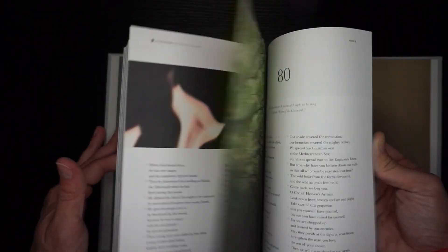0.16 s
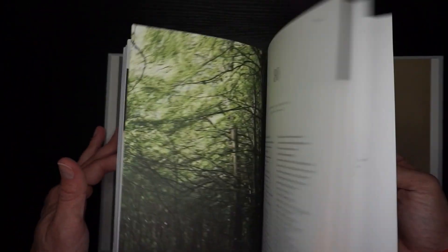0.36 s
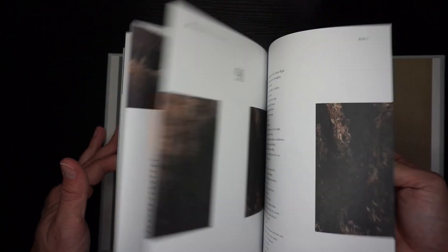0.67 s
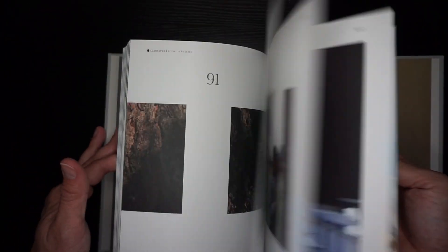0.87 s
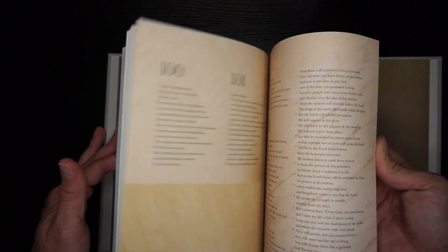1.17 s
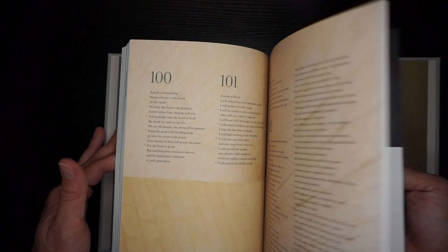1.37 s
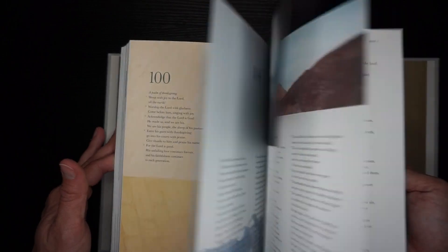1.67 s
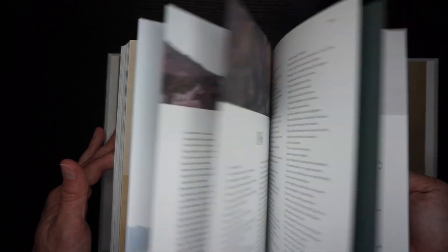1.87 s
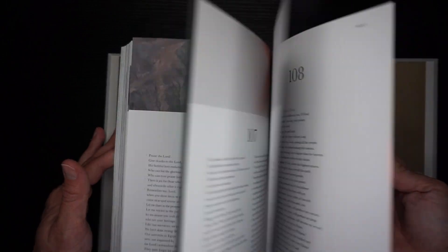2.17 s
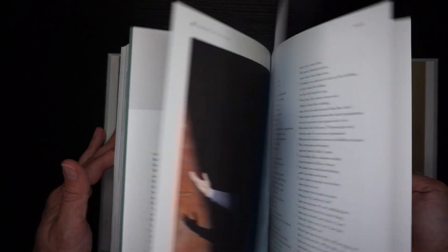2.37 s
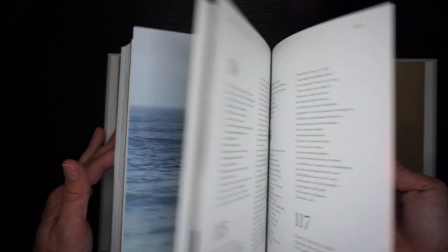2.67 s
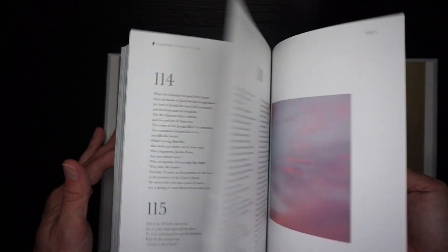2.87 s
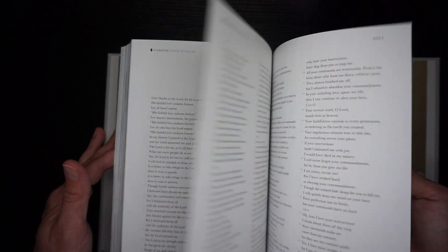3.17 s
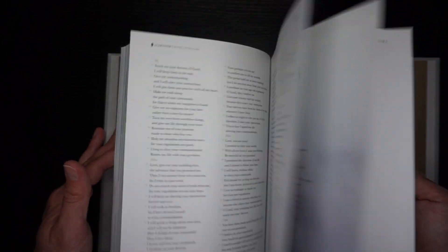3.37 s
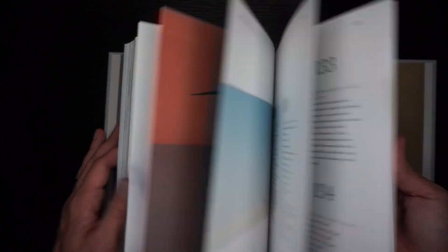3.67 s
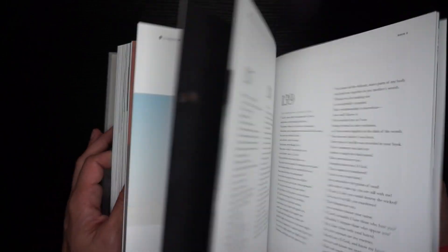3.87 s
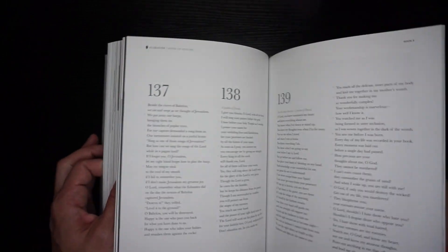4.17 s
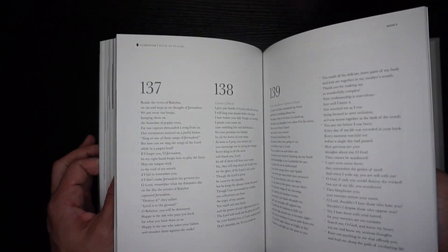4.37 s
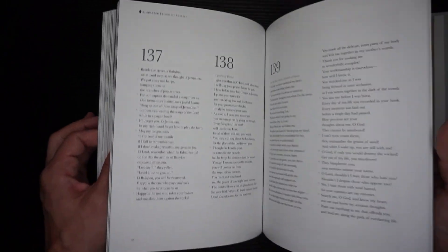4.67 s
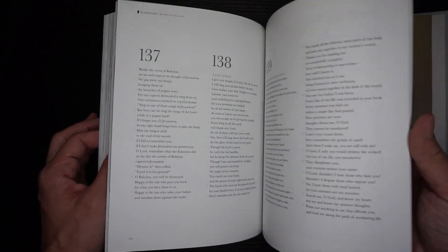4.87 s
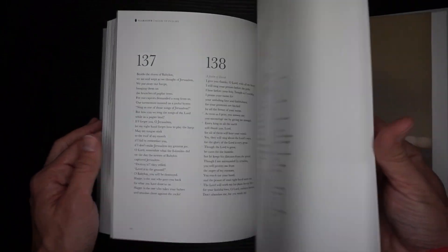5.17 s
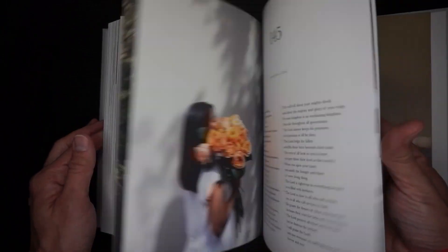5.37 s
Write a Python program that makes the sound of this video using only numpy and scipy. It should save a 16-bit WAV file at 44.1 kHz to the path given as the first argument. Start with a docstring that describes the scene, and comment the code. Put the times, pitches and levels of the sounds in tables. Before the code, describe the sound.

Pages of a hardcover book flick softly past a thumb, then the block of pages knocks and slides, close by.

```python
"""In a quiet room, close by, a thumb lets the glossy pages of a hardcover book go one by one.
Each edge flicks free and pops the wedge of air between the sheets. Paper rubs on paper in many tiny
catches and slips, and the thumb squeaks once. Then the hand takes a new grip: the block of pages knocks
and slides before the flipping goes on. Ventilation and a far motor hum softly underneath."""
import sys
import numpy as np
from scipy import signal
from scipy.fft import irfft
from scipy.io import wavfile
from scipy.ndimage import uniform_filter1d

SR = 44100
rng = np.random.default_rng(int(sys.argv[2]) if len(sys.argv) > 2 else 0)


def store_pcm(level_fs):
    """Save levels as 16-bit WAV."""
    pcm = np.round(np.clip(level_fs, -1, 1) * 32767).astype(np.int16)
    wavfile.write(sys.argv[1], SR, np.atleast_2d(pcm).T)


N = 243890


def gain_of(db):
    return 10 ** (np.asarray(db) / 20)


def unit_rms(x):
    return x / np.sqrt(np.mean(x ** 2) + 1e-20)


def unit_peak(x):
    return x / abs(x).max()


def curve_at(points, hz):
    point_hz, value = np.transpose(points)
    return np.interp(np.log(hz + 1), np.log(point_hz + 1), value)


def add(mix, start_s, sound):
    part = mix[..., round(start_s * SR):][..., :sound.shape[-1]]
    part += sound[..., :part.shape[-1]]


def filtered(x, kind, hz, order=3):
    return signal.lfilter(*signal.butter(order, hz, kind, fs=SR), x)


def ring(x, resonances):
    """Make x ring at each (pitch_hz, width_hz, level_db); neighbours get opposite signs."""
    out = 0
    for k, (hz, width_hz, db) in enumerate(resonances):
        b, a = signal.iirpeak(min(hz, SR / 2.2), hz / width_hz, SR)
        out = out + (-1) ** k * gain_of(db) * signal.lfilter(b, a, x)
    return unit_rms(out)


# The room's noise from bass to treble: pitch_hz, level_db
ROOM_TONE = [(15, -31), (25, -14), (50, -3.5), (80, -1), (160, -1), (310, -2), (500, -2.5), (700, -4),
             (1000, -6.5), (1500, -7), (2000, -12), (2500, -12), (4000, -15), (15600, -22)]
# How alike that noise is left and right: pitch_hz, likeness (1 = the same)
ROOM_LIKENESS = [(30, 0.97), (100, 1), (300, 0.21), (800, 0.017), (2000, 0.018), (5000, 0.087)]


def room(level_db=-58):
    """Ventilation rumbles and the microphones hiss, a little unevenly."""
    frames, hz = N // 256 + 5, np.fft.rfftfreq(1024, 1 / SR)
    a, b, c, d, patches = rng.standard_normal((frames, 513, 5)).T
    patches = unit_rms(uniform_filter1d(uniform_filter1d(patches, 10, 0), 14, 1))
    likeness = curve_at(ROOM_LIKENESS, hz)[:, None]
    left = a + 1j * b
    right = likeness * left + np.sqrt(1 - likeness ** 2) * (c + 1j * d)
    spectrum = np.array([left, right]) * gain_of(curve_at(ROOM_TONE, hz)[:, None] + 0.11 * patches)
    noise = signal.istft(spectrum, nperseg=1024, noverlap=768)[1][:, :N]
    return gain_of(level_db) * unit_rms(noise)


# How the motor's hum comes and goes: time_s, level_db
MOTOR_LEVELS = [(0, -71), (.6, -72.5), (1.3, -65.5), (2, -66.5), (3.2, -68.5), (3.6, -66.5), (5.53, -74.5)]
# Its two low notes: pitch_hz, width_hz, level_db
MOTOR_NOTES = [(94.5, 18.5, -2.2), (139.1, 10.3, -1.3)]


def far_motor():
    """A wavering hum: noise squeezed into two narrow, low bands."""
    hum = ring(ring(rng.standard_normal(N), MOTOR_NOTES), MOTOR_NOTES)
    level_db = np.interp(np.arange(N) / SR, *np.transpose(MOTOR_LEVELS))
    return hum * gain_of(level_db)


def wall_echoes(x, fade_s=0.083):
    """The walls send back a short tail of echoes, different left and right."""
    t = np.arange(6000) / SR
    echoes = rng.standard_normal((2, len(t))) * (rng.random((2, len(t))) < .06)
    echoes *= gain_of(-60 * t / fade_s) * (t > .003)
    echoes /= np.linalg.norm(echoes[0])
    return signal.oaconvolve(filtered(x, "high", 700, order=2)[None], echoes, axes=1)[:, :N]


# The cover bumps in the hand: start_s, level_db, pitch_hz
COVER_BUMPS = [(1.347, -52, 120), (3.176, -47, 131), (3.197, -56, 124), (3.801, -40, 231),
               (3.862, -33, 244), (3.885, -43, 141), (3.922, -36.5, 171), (3.949, -39, 220),
               (3.976, -45.5, 148)]


def cover_bumps():
    """Each bump is a soft, low push of little more than one wave."""
    out, t = np.zeros(N), np.arange(4000) / SR
    for start_s, db, hz in COVER_BUMPS:
        swell = t ** 2 * np.exp(-t * hz / .3)
        add(out, start_s, gain_of(db) * unit_peak(swell * np.sin(2 * np.pi * hz * t)))
    return out


# The path of the squeak: time_s, pitch_hz, level_db
SQUEAK_PATH = [(1.734, 2330, -61), (1.738, 2530, -39), (1.742, 2500, -44), (1.745, 3030, -42),
               (1.752, 3210, -40), (1.7555, 3320, -44), (1.761, 3130, -36.5), (1.767, 2960, -44.5),
               (1.774, 2750, -50)]


def thumb_squeak():
    """Skin sticks and slips in step on glossy paper: a slightly rough tone that arches up."""
    times, hz, db = np.transpose(SQUEAK_PATH)
    t, out = np.arange(times[0], times[-1], 1 / SR), np.zeros(N)
    grip = 1 + 0.039 * unit_rms(uniform_filter1d(rng.standard_normal(len(t)), 60))
    tone = np.sqrt(2) * grip * np.sin(2 * np.pi * np.cumsum(np.interp(t, times, hz)) / SR)
    add(out, times[0], tone * gain_of(np.interp(t, times, db)))
    return out


# How wide the paper sounds: pitch_hz, side_db (compared with the middle)
PAGE_WIDTH = [(60, -17.5), (150, -35), (380, -59), (950, -16.5), (2380, -3), (5980, -2), (15000, -10)]


def spread(pair):
    """Contacts lie all along the page: one stream is the middle, the other widens the treble."""
    side_gain = gain_of(curve_at(PAGE_WIDTH, np.fft.rfftfreq(512, 1 / SR)))
    side_filter = np.roll(irfft(side_gain), 256) * np.hanning(512)
    side = signal.oaconvolve(pair[1], side_filter, "same")
    return np.array([pair[0] + side, pair[0] - side])


def slips(size, per_s, uneven_db, clump_db):
    """Paper catches and lets go: two streams of uneven clicks, bunched in clumps of about 15 ms."""
    clicks = rng.standard_normal((2, size))
    clicks *= gain_of(uneven_db * np.minimum(rng.exponential(1, (2, size)), 4))
    clumps = unit_rms(uniform_filter1d(uniform_filter1d(rng.standard_normal(size), 500), 500))
    happens = rng.random((2, size)) < per_s / SR
    return clicks * happens * gain_of(clump_db * clumps)


# Where a sheet rings in the treble: pitch_hz, width_hz, level_db
SHEET_RINGS = [(3470, 580, -13), (4310, 520, 5), (5700, 870, 3), (7700, 3200, -3), (11400, 8700, -13.5)]


def sheet_hiss(clicks, waver_db=0.76):
    """Each band of the hiss swells and sinks on its own as the sheet bends."""
    treble = filtered(clicks, "high", 3300)  # the sheet gives off no bass
    size, out = clicks.shape[-1], 0
    bends = rng.standard_normal((len(SHEET_RINGS), size // 2000 + 2))
    for k, ((hz, width_hz, db), bend) in enumerate(zip(SHEET_RINGS, bends)):
        drift = np.interp(np.arange(size) / 2000, np.arange(len(bend)), bend)
        band = np.sqrt(width_hz) * ring(treble, [(hz, width_hz, 0)])
        out = out + (-1) ** k * gain_of(db + waver_db * drift) * band
    return unit_rms(out)


# Where the book's body, page gaps, thumb gap and cover ring: pitch_hz, width_hz, level_db
BODY_RINGS = [(660, 66, 1.5), (790, 51, 10.5), (893, 81, 8), (1057, 127, 5.5), (1177, 99, 6),
              (1350, 92, 3.5), (1500, 126, 6), (1640, 170, 3)]
GAP_RINGS = [(660, 98, 0), (850, 200, 0.5), (1380, 230, -1.5), (2665, 340, -4)]
THUMB_RINGS = [(2308, 280, 1.5), (2850, 495, 2.06), (3193, 1040, -2)]
COVER_RINGS = [(230.5, 115, -2), (463, 173, -1)]


def paper_friction(size, clump_db, thumb_db, hiss_db):
    """Coarse slips ring the book's body, thumb gap and cover; fine slips make the sheet hiss."""
    coarse = slips(size, per_s=6000, uneven_db=0.72, clump_db=clump_db)
    fine = slips(size, per_s=15000, uneven_db=1.0, clump_db=clump_db)
    low = ring(filtered(coarse, "low", 1900), [(1030, 3500, 0)])
    lightness = np.clip(clump_db / 4.4, 0, 1)  # a light, clumpy touch brings out the loose gaps
    body = np.sqrt(1 - lightness) * ring(low, BODY_RINGS)
    gaps = np.sqrt(lightness) * ring(low, [GAP_RINGS[0], GAP_RINGS[2]])
    high = ring(filtered(coarse, "high", 2150), [(2530, 1280, 0)])
    thumb = gain_of(thumb_db) * ring(high, THUMB_RINGS)
    notched = signal.lfilter(*signal.iirnotch(350, 3.0, SR), coarse)
    cover = gain_of(-20 - 0.5 * hiss_db) * ring(ring(notched, COVER_RINGS), COVER_RINGS)
    return spread(body + gaps + cover + thumb + gain_of(hiss_db) * sheet_hiss(fine))


# Sheets slide past each other: peak_s, level_db, rise_s, fall_s, thumb_db, hiss_db
# (the last two are compared with level_db)
SLIDES = [(0.01, -56, 0.055, 0.31, -7.5, -11.5), (0.3, -55.5, 0.058, 0.22, -7, -13.5),
          (0.878, -63.5, 0.13, 0.063, -3, -6.5), (1.254, -60, 0.11, 0.16, -5, -5.5),
          (1.79, -62, 0.13, 0.3, 0.5, -9.5), (2.318, -62.5, 0.14, 0.35, -5.5, -5.5),
          (2.566, -62.5, 0.056, 0.031, -5.5, -11), (3.0, -67, 0.67, 0.95, -23, -32),
          (3.146, -58.5, 0.0132, 0.017, -2, -11), (3.455, -62.5, 0.067, 0.4, -3.5, -10),
          (3.576, -48, 0.018, 0.17, -10, -14.5), (3.745, -50.5, 0.019, 0.043, -8, -7),
          (3.8, -46.5, 0.0157, 0.079, -4.5, -10.5), (3.87, -32.5, 0.025, 0.035, -15, -16.5),
          (3.96, -35, 0.085, 0.068, -13.5, -19.5), (4.085, -49, 0.041, 0.11, -9.5, -12.5),
          (4.17, -47.5, 0.062, 1, -15.5, -19.5), (4.47, -37.5, 0.11, 0.22, -10.5, -16),
          (4.58, -33.5, 0.19, 0.14, -8.5, -18), (4.69, -38, 0.16, 0.05, -16, -20.5),
          (4.8, -53, 0.068, 0.16, -7, -5), (4.885, -47.5, 0.014, 0.06, -5, -14),
          (4.93, -46, 0.05, 0.0605, -4.5, -9), (5.0, -53.5, 0.15, 0.125, -4, -5.5),
          (5.085, -51.5, 0.065, 0.064, 0.5, -4), (5.16, -54, 0.14, 0.079, 1.5, -4.5),
          (5.449, -57.5, 0.19, 0.31, -2, -5)]


def slide_levels(drop_db=14, roundness=1.37, rest_db=-72.5):
    """Slides swell, fade and add up: the levels in dB of the rub, thumb scrape and hiss."""
    t = np.arange(0, N / SR + .01, .002)
    power = gain_of(2 * (rest_db + np.array([[0], [-9], [-17]])))  # pages never lie quite still
    for peak_s, db, rise_s, fall_s, thumb_db, hiss_db in SLIDES:
        from_peak = abs(t - peak_s) / np.where(t < peak_s, rise_s, fall_s)
        level_db = db - drop_db * from_peak ** roundness
        power = power + gain_of(2 * (level_db + np.array([[0], [thumb_db], [hiss_db]])))
    return [np.interp(np.arange(N) / SR, t, 10 * np.log10(p)) for p in power]


def page_rub():
    """Sheets slide under the thumb; a firm slide touches in many spots and sounds smoother."""
    rub_db, thumb_db, hiss_db = slide_levels()
    clump_db = np.interp(rub_db, [-60, -42], [2.4, .4])
    return gain_of(rub_db) * paper_friction(N, clump_db, thumb_db - rub_db, hiss_db - rub_db)


# Short scrapes before a page slips off: start_s, length_s, level_db, starting_hiss_db
EDGE_SCRAPES = [(3.749, 0.044, -36, -19), (5.141, 0.029, -51, -6), (5.302, 0.074, -44, -15)]


def edge_scrapes():
    """Each scrape grows, brightens and dies quickly when the edge comes free."""
    out = np.zeros((2, N))
    for start_s, length_s, db, hiss_db in EDGE_SCRAPES:
        progress = np.arange(0, length_s + 0.013, 1 / SR) / length_s
        growing = np.minimum(progress * 4, 1) * gain_of(7.3 * (progress - 1))
        swell = np.where(progress < 1, growing, gain_of(-70 * (progress - 1)))
        rising_db = hiss_db + 8 * np.minimum(progress, 1)
        scrape = paper_friction(len(progress), clump_db=0, thumb_db=-9.5, hiss_db=rising_db)
        add(out, start_s, gain_of(db) * swell * scrape)
    return out


def edge_crackle(per_s=160):
    """Tiny random edge snaps each pop one gap between the pages."""
    snaps = gain_of(3.8 * np.minimum(rng.exponential(1, (2, N)), 3)) * (rng.random((2, N)) < per_s / SR)
    which_gap, pops = rng.integers(0, len(GAP_RINGS), N), 0
    for k, (hz, width_hz, db) in enumerate(GAP_RINGS):
        broad = ring(snaps * (which_gap == k), [(hz, 2 * width_hz, 0)])
        pops = pops + gain_of(db) * ring(broad, [(hz, width_hz, 0)])
    clicks = filtered(snaps, "band", [550, 3200])
    level_db = np.clip(slide_levels()[0], -62, -55) - 5.5  # follows the rub, lost under a firm slide
    return gain_of(level_db) * spread(unit_rms(pops) + 0.2 * unit_rms(clicks))


# Thin cracks of a sheet's corner: peak_s, level_db, pitch_hz, half_length_s
CORNER_TICKS = [(0.303, -51, 3830, 0.00275), (0.439, -47, 4050, 0.0028), (0.447, -46, 4080, 0.0027),
                (0.868, -51.5, 6190, 0.0043), (1.178, -54, 4300, 0.0057), (1.25, -53, 5000, .006),
                (1.562, -54, 4500, 0.00274), (2.31, -50.5, 4320, 0.0052), (2.343, -50, 3500, .004),
                (2.578, -48, 4500, 0.0045), (2.811, -51, 8000, 0.0039), (3.146, -52, 5400, 0.0053),
                (3.246, -52, 5220, 0.0055), (3.356, -54, 5660, 0.017), (3.463, -51, 5370, 0.0083),
                (3.76, -41, 13500, 0.0068), (3.775, -44, 10900, .01), (3.795, -46, 6500, .004),
                (3.857, -29.5, 5650, 0.003), (3.915, -41.5, 8000, 0.0057), (3.95, -36, 4700, .004),
                (4.055, -45.5, 4200, 0.0023), (4.267, -36, 7370, 0.002), (4.29, -42.5, 7500, 0.0072),
                (4.776, -45.5, 4300, 0.0036), (5.082, -44, 7600, .006), (5.175, -55, 4470, .004),
                (5.369, -43, 7000, 0.0068)]


def corner_ticks():
    """A corner cracks: a very short burst of noise with a hint of pitch."""
    out, t = np.zeros((2, N)), np.arange(2000) / SR
    for peak_s, db, hz, half_s in CORNER_TICKS:
        burst = rng.standard_normal((2, len(t))) * np.exp(-(t / half_s - 2) ** 2)
        crack = ring(burst, [(hz, 800, 0), (5200, 5000, -8)])
        crack = spread(filtered(crack, "high", 2200, order=2))
        add(out, peak_s - 2 * half_s, gain_of(db) * unit_peak(crack))
    return out


def page_snap(hz, edge_db, ring_s, hollow, rise_s, flutter):
    """An edge snaps, shaking the book, and the air wedge rings, fading 60 dB in ring_s."""
    t = np.arange(3000) / SR
    snap = 0.45 * rng.standard_normal((2, len(t))) * np.exp(-t / .004) * (1 - np.exp(-t / 0.00083))
    snap[0, 0] -= 1  # one sharp release ahead of the small slips
    pop = np.sin(2 * np.pi * hz * t) * gain_of(-60 * t / ring_s) * (1 - np.exp(-(t / rise_s) ** 2))
    pop = filtered(pop, "high", 450, order=2)  # an open wedge holds no bass
    after_pops = signal.oaconvolve(snap[1], pop)[:len(t)]  # the small slips pop it again
    wedge = unit_peak(unit_peak(pop) + flutter * unit_peak(after_pops))
    click = filtered(snap[0], "band", [500, 1800])
    knock = unit_peak(unit_peak(click) + .5 * unit_peak(ring(click, BODY_RINGS)))
    edge = unit_peak(spread(ring(filtered(snap, "band", [2250, 3400]), THUMB_RINGS)))
    return hollow * wedge + (1 - hollow) * knock + gain_of(edge_db) * edge


# The block of pages slaps down: start_s, level_db, pitch_hz, edge_db (compared with level_db), ring_s
BLOCK_SLAPS = [(3.855, -28.5, 1420, -1, 0.012), (3.86, -27, 884, -25, 0.021), (3.865, -18, 687, -33, 0.024),
               (3.869, -20, 1030, -34, 0.045), (3.872, -15, 750, -39, 0.022),
               (3.917, -20.5, 946, -27, 0.075), (3.921, -20, 1500, -37, 0.0087),
               (3.926, -16.5, 710, -40, 0.0065), (3.931, -14, 885, -42, 0.0046),
               (3.9312, -13, 937, -43.5, 0.045), (3.952, -20.5, 890, -18, 0.025)]


def block_slaps():
    """Many pages land together with a hollow knock, mostly the ring of the air wedge."""
    out = np.zeros((2, N))
    for start_s, db, hz, edge_db, ring_s in BLOCK_SLAPS:
        slap = page_snap(hz, edge_db, ring_s, hollow=0.91, rise_s=0.0015, flutter=0)
        add(out, start_s, gain_of(db) * slap)
    return out


# Single page edges let go: start_s, level_db, pitch_hz, edge_db (compared with level_db)
PAGE_FLICKS = [(0.012, -47, 1340, -2.5), (0.142, -51, 1440, -2.5), (0.215, -43, 1290, -3),
               (0.248, -50, 800, -11), (0.305, -48, 1290, -11), (0.329, -53, 1410, -3),
               (0.482, -53, 1290, -12), (0.518, -54, 1350, -9), (2.054, -58, 1350, -11),
               (2.272, -57, 1350, -13), (0.265, -43, 1250, -2.5), (0.299, -48.5, 800, 1),
               (0.36, -48, 1400, -7), (0.408, -44.5, 850, -3), (0.439, -41, 1164, -12),
               (0.447, -42.5, 1640, -6), (0.549, -47, 630, -2), (0.647, -44, 1390, -10),
               (0.73, -51, 1300, -7), (0.859, -49.5, 660, 0), (0.917, -51, 1300, -5),
               (1.051, -55, 1450, -15), (1.202, -52, 1100, -4.5), (1.248, -43.5, 1140, -8),
               (1.233, -49, 1110, -16), (1.315, -49, 1400, -1), (1.333, -47, 705, -3),
               (1.351, -44.5, 1610, -7.5), (1.504, -50.5, 860, 2), (1.56, -54, 1300, -2),
               (1.64, -49, 1480, -20), (1.706, -56, 790, 4), (1.727, -39.5, 1280, -2.5),
               (1.741, -44.5, 1300, -9), (1.819, -47.5, 1040, 1), (1.848, -41, 1350, -7),
               (1.866, -44, 940, -13), (1.917, -50, 1400, -8), (2.021, -42.5, 1350, -7.5),
               (2.08, -54, 1270, -6), (2.22, -46, 1400, -5), (2.228, -48, 1500, -10),
               (2.306, -40.5, 1140, -17), (2.309, -40.5, 1350, -8), (2.34, -46, 1250, -7.5),
               (2.38, -45.5, 1310, -12), (2.412, -41.5, 1260, -6.5), (2.418, -47, 1380, -4),
               (2.449, -45, 1100, -14), (2.552, -43.5, 1410, -6), (2.579, -42.5, 1420, -19),
               (2.702, -46, 750, -3), (2.728, -46.5, 1270, -7), (2.813, -43, 1350, -8),
               (2.852, -38.5, 575, -33), (2.874, -49.5, 577, -24), (2.918, -43, 640, -10),
               (2.938, -40, 690, -34), (2.944, -40.5, 680, -30), (2.962, -44.5, 635, -15),
               (2.985, -49, 1500, -12), (3.008, -48, 680, -20), (3.053, -54.5, 1460, -13),
               (3.084, -51, 1400, -12), (3.362, -46, 1670, -5), (3.144, -48, 1520, -9),
               (3.174, -47, 606, -11), (3.25, -42.5, 1400, -18), (3.254, -41, 1170, -18),
               (4.152, -36.5, 644, -32), (4.881, -39, 875, -14), (4.931, -33, 960, -16)]


def page_flicks(ring_cycles=12):
    """A page springs off the thumb; the duller its edge, the more the air wedge rings."""
    out = np.zeros((2, N))
    for start_s, db, hz, edge_db in PAGE_FLICKS:
        hollow = np.clip(0.29 - 0.03 * edge_db, 0, 1)
        flick = page_snap(hz, edge_db, ring_cycles / hz, hollow, rise_s=0.00061, flutter=.25)
        add(out, start_s, gain_of(db) * flick)
    return out


def scene():
    """The book and its faint echo over the quiet room."""
    book = page_rub() + edge_scrapes() + edge_crackle() + corner_ticks() + block_slaps() + page_flicks()
    book *= gain_of([[-.6], [.6]])  # the thumb is nearer the right microphone
    book[0] = np.roll(book[0], 1)  # so the left hears it a moment later
    echoes = gain_of(-9.5) * wall_echoes(book.mean(0))
    return room() + far_motor() + echoes + cover_bumps() + thumb_squeak() + book


def record(dry):
    """Cut away the very highest treble."""
    low_pass = signal.firwin(1535, 15730, window=("kaiser", 9), fs=SR)
    return signal.oaconvolve(dry, low_pass[None], "same")


dry = scene()
out = record(dry)
store_pcm(out)
```